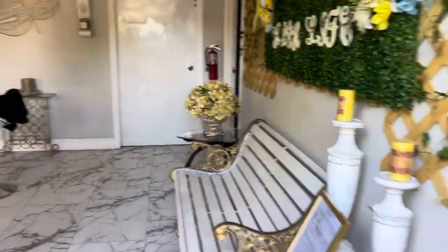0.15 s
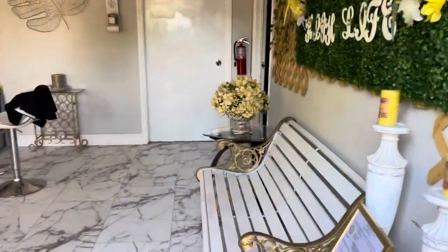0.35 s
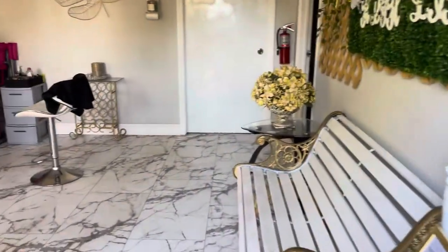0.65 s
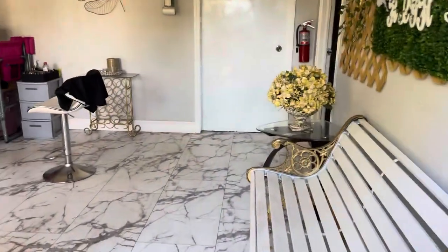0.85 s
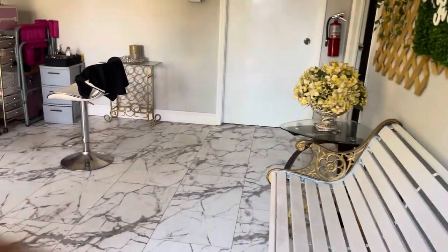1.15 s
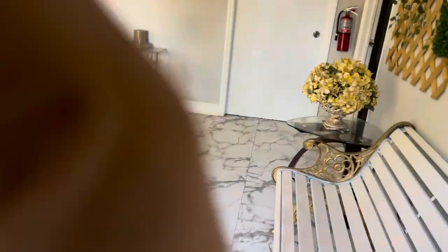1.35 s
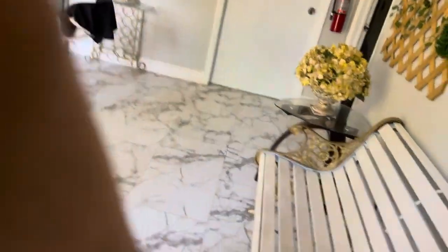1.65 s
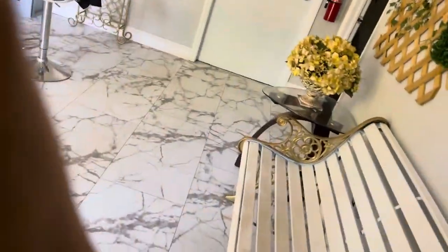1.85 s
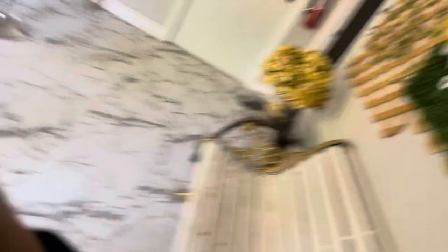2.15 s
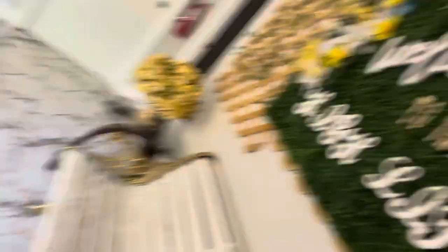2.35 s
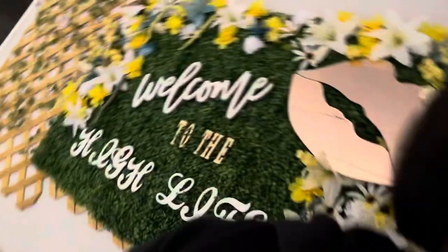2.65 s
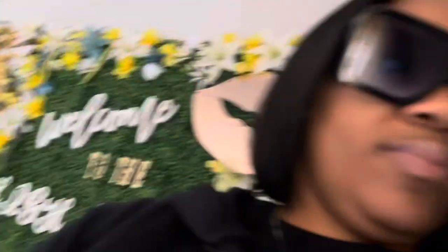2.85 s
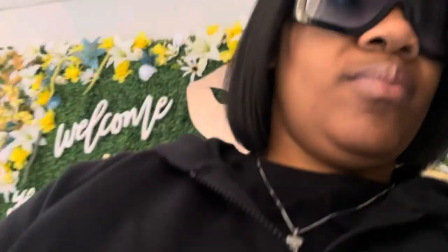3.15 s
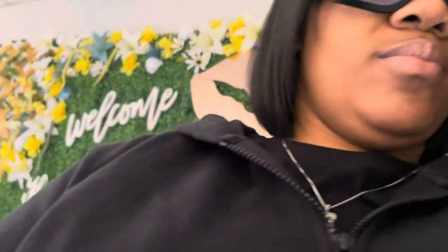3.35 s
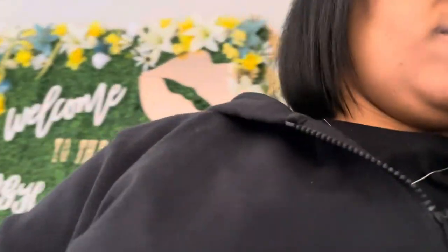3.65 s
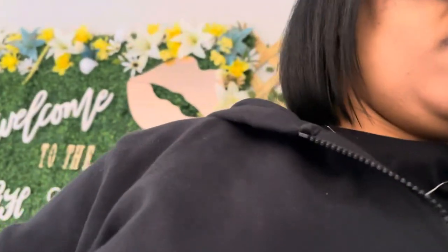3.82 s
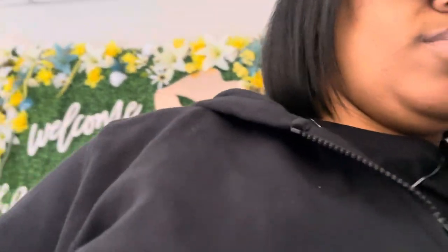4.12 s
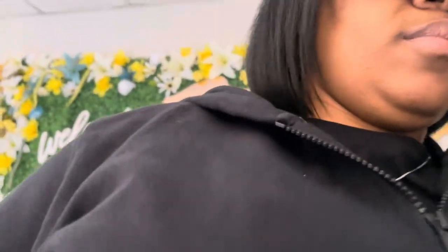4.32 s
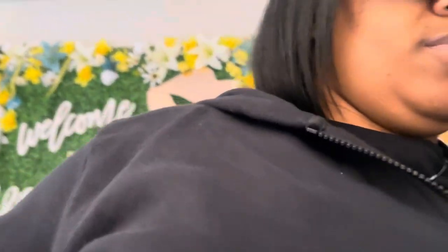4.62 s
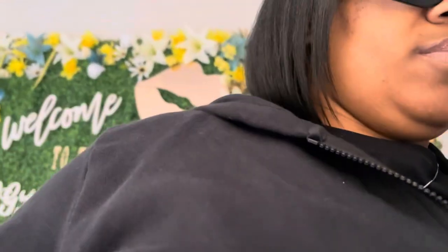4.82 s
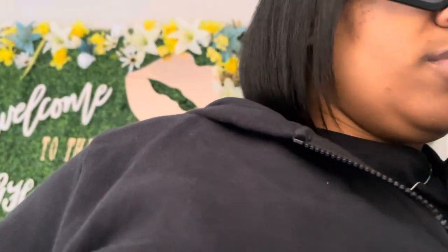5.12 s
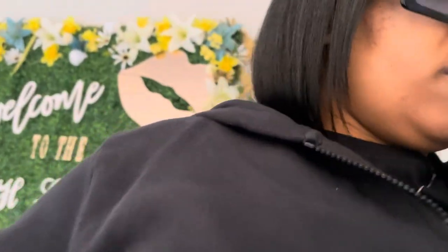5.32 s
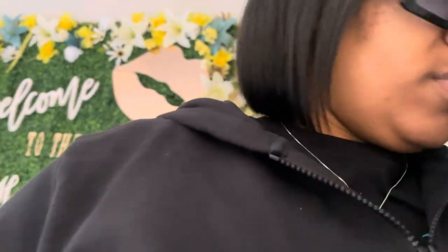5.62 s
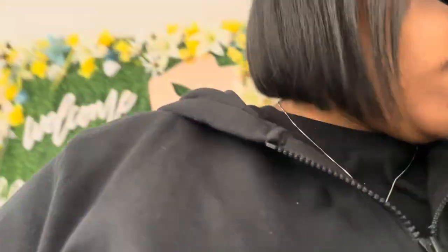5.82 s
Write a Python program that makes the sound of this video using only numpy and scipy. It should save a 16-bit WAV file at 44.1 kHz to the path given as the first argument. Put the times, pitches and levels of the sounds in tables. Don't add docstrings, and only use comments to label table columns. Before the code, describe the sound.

A reverberant tiled entrance room, heard through a handheld stereo phone microphone. At 0 s a deep, short double boom of a door leaf swells and dies, with handling rumble and jacket rustle. Until 2 s small bright key ticks, dull bumps and cloth snaps follow movement; a moderate metallic knock rings at 1.4 s and a crisp key tick comes at 1.5 s. At 2.15 s a firm double knock leads directly into a very loud, woody slam at 2.3 s, rebounding several times, with low boom and ringing panel fading until about 3 s. Loose fittings rattle from 2.4 to 2.7 s, and cloth and a bright key tick stand out near 2.5 s. Then it is quiet: soft sleeve slides around 3.3, 4.4, 4.8, 5.3 and 5.7 s, over faint air. A hard latch clack sounds at 3.97 s, a sharper, ringing bolt clack at 5.08 s. A barely audible distant motor hums between 4.6 and 5 s.

```python
import sys
import numpy as np
from scipy import signal
from scipy.fft import rfft, irfft
from scipy.io import wavfile
from scipy.ndimage import uniform_filter1d

SR = 44100
rng = np.random.default_rng(int(sys.argv[2]) if len(sys.argv) > 2 else 0)


def pcm_store(signal):
    levels = np.round(np.clip(np.atleast_2d(signal), -1, 1) * 32767)
    wavfile.write(sys.argv[1], SR, levels.astype(np.int16).T)


def voltage_ratio(decibels):
    exponent = np.asarray(decibels, float) / 20
    return 10 ** exponent


N = 263433
T = np.arange(N) / SR
HZ = np.arange(N // 2 + 1) * SR / N + 1e-3

# (frequency [Hz], width [Hz], lift [dB])
LEAF_BODY = [(207, 22, -1.5), (251, 22, 2), (267.1, 3.5, 4.5), (320, 5.6, 2.5), (376, 16, 7), (442, 3, 3.5),
             (530, 18, -1), (599.7, 31, 4.5), (697, 9.6, 5), (900, 26, 3), (1143, 60, 4.5), (1370, 170, 4)]


def on_log(table, col=1):
    t = np.array(table, float)
    return np.interp(np.log(HZ), np.log(t[:, 0]), t[:, col])


def colour(x, spectrum, body=()):
    octaves_below = np.clip(np.log2(spectrum[0][0] / HZ), 0, 4)
    db = on_log(spectrum) - 12 * octaves_below
    for hz, width, lift_db in body:
        db = db + lift_db / (1 + (2 * (HZ - hz) / width) ** 2)
    cepstrum = irfft(np.log(voltage_ratio(db)), N)
    cepstrum[1:(N + 1) // 2] *= 2
    cepstrum[(N + 1) // 2:] = 0
    response = np.exp(rfft(cepstrum))
    return irfft(rfft(x) * response / np.sqrt(np.mean(abs(response) ** 2)), N)


def band_level(x, lo_hz, hi_hz):
    power = abs(rfft(x[0])[(HZ > lo_hz) & (HZ < hi_hz)]) ** 2
    return x / (np.sqrt(2 * power.sum()) / N)


def walk(rate):
    k = int(SR / rate)
    steps = np.repeat(rng.standard_normal(N // k + 1), k)
    w = uniform_filter1d(uniform_filter1d(steps, k), k)[:N]
    return w / w.std()


def decay(t, t60):
    return np.exp(-np.log(1000) * t / t60)


def blow(events, spectrum, body):
    near, far = np.zeros((2, N)), np.zeros(N)
    for s, db, shudder_ms, hall_db in events:
        t = np.clip(T - s, 0, None)
        onset = np.clip(t / 0.00055, 0, 1)
        shudder = onset * np.exp(-t * 1000 / shudder_ms) * voltage_ratio(1.5 * walk(150))
        hit = colour(shudder * rng.standard_normal((2, N)), spectrum, body)
        hit *= voltage_ratio(db) / abs(hit).max()
        near += hit
        far += hit[0] * voltage_ratio(hall_db)
    return near, far


def rings(strikes, modes):
    out = np.zeros((2, N))
    t = T[:SR // 2]
    rise = 1 - np.exp(-t / 0.003)
    for hz, mode_db, t60 in modes:
        waver = voltage_ratio(4 * walk(45))
        for (s, db), turn in zip(strikes, rng.random((len(strikes), 2, 1))):
            i = int(s * SR)
            swing = np.sin(2 * np.pi * (hz * t + turn))
            level = voltage_ratio(db + mode_db) * waver[i:i + len(t)]
            out[:, i:i + len(t)] += level * rise * decay(t, t60) * swing
    return out


def ticks(events, spread, steep=1):
    near, far = np.zeros((2, N)), np.zeros(N)
    size, lead_s = 4096, 0.004
    t, f = T[:size], np.arange(1, size // 2 + 2) * SR / size
    for s, db, hz, ms, hall_db in events:
        fade = np.exp(-np.clip(t - lead_s, 0, None) * 1000 / ms) * (t >= lead_s)
        burst = rng.standard_normal((2, size)) * fade
        burst[:, int(lead_s * SR)] += 4
        octaves = np.log2(f / hz) / spread * np.where(f > hz, steep, 1)
        tick = irfft(rfft(burst) * np.exp(-0.5 * octaves ** 2), size)
        i = int((s - lead_s) * SR)
        tick = (tick * voltage_ratio(db) / abs(tick).max(axis=1, keepdims=True))[:, :N - i]
        near[:, i:i + size] += tick
        far[i:i + size] += tick[0] * voltage_ratio(hall_db)
    return near, far


def gesture(s, db, rise_s, fall_s, shape=1):
    rise_s, fall_s = max(rise_s, 0.005), max(fall_s, 0.005)
    away = np.maximum((s - T) / rise_s, (T - s) / fall_s)
    return voltage_ratio(db - 20 * away ** shape) ** 2


def rub(spectrum, body, lo_hz, hi_hz, grit_db, flutter_db):
    grit = grit_db * np.minimum(rng.exponential(size=N), 4)
    grains = rng.standard_normal((2, N)) * voltage_ratio(grit + flutter_db * walk(40))
    return band_level(colour(grains, spectrum, body), lo_hz, hi_hz)


def slam():
    # (time [s], peak [dB], shudder [ms], hall [dB])
    blows = [
        (2.3055, -4, 5, -6.5),
        (2.309, -1.5, 13.7, -6),
        (2.325, -0.5, 12.7, -6),
        (2.347, -6, 15.7, -7),
        (2.381, -12, 21, -7),
        (2.401, -16.5, 25, -5.5),
    ]
    # (frequency [Hz], density [dB per Hz])
    spectrum = [(130, -7.5), (260, -3), (500, -8), (900, -9), (1500, -17), (2400, -25.5), (3800, -26.5),
                (5500, -33.5), (7500, -38), (10500, -34), (11800, -40), (13000, -49.5), (15500, -96.5)]
    # (time [s], level [dB])
    strikes = [(2.306, -18), (2.326, -23), (2.349, -25.5), (2.381, -27.5)]
    # (frequency [Hz], level [dB], t60 [s])
    modes = [(200.3, -8, 0.3), (233, -6, 0.22), (276, -3.5, .15), (316, -1.5, 0.17), (377, -3.5, .2),
             (501, -3.5, 0.24), (587, -7, 0.25), (746, -7, 0.24), (900, -7.5, 0.3), (1049, -7, 0.21),
             (1640, -16.5, 0.27), (2052, -16.5, 0.086), (2299, -18, .17), (4300, -20, 0.34)]
    near, far = blow(blows, spectrum, LEAF_BODY)
    return near + rings(strikes, modes), far


def booms():
    # (time [s], deep level [dB], upper level [dB], upper pitch [Hz], t60 [s])
    touches = [(0.008, -18, -3, 94.5, 0.058), (0.042, -16, -7.5, 84.3, 0.1), (0.068, -32, -20, 76.5, 0.57),
               (1.439, -37, -31, 81.6, 0.43), (1.602, -52, -47, 72, 0.68), (1.968, -43, -35.5, 81.3, 0.21),
               (2.158, -21.5, -19, 88, 0.29), (2.307, -25, -15, 98, 0.18), (2.331, -9, -4.5, 81.5, 0.21),
               (2.427, -14.5, -22.5, 80, 0.32), (2.53, -18, -31, 79.05, 0.61),
               (2.751, -24.5, -35.5, 75.4, 0.54), (2.899, -34, -45, 77.3, 0.81),
               (3.069, -39.5, -54, 76, 0.42)]
    deep_hz, deep_rise_s, upper_rise_s = 48.3, 0.0018, 0.0097
    out = np.zeros(N)
    next_times = [touch[0] for touch in touches[1:]] + [99]
    for (s, deep_db, upper_db, hz, t60), next_s in zip(touches, next_times):
        t = np.clip(T - s, 0, None)
        fade = decay(t, t60) * np.exp(-np.clip(T - next_s, 0, None) / 0.015)
        deep = voltage_ratio(deep_db) * (1 - np.exp(-t / deep_rise_s)) * np.sin(2 * np.pi * deep_hz * t)
        upper = voltage_ratio(upper_db) * (1 - np.exp(-t / upper_rise_s)) * np.sin(2 * np.pi * hz * t)
        out += fade * (deep + upper)
    return out * np.array([[1], [0]])


def knocks():
    # (time [s], peak [dB], shudder [ms], hall [dB])
    fitting_blows = [
        (1.416, -29.5, 25, -2.5),
        (2.140, -40, 9, -5),
        (2.1495, -19, 12, -6),
    ]
    # (time [s], peak [dB], shudder [ms], hall [dB])
    leaf_blows = [
        (2.157, -17.5, 10, -5),
        (2.177, -18.5, 17, -3.5),
    ]
    # (frequency [Hz], density [dB per Hz])
    spectrum = [(130, -11), (260, -8.5), (500, -17.5), (900, -19.5), (1500, -23), (2400, -24),
                (3800, -30.5), (5500, -27.5), (7500, -30.5), (10500, -27), (11800, -39), (13000, -45.5),
                (15500, -94.5)]
    # (frequency [Hz], width [Hz], lift [dB])
    fitting_body = [(300, 300, -3), (950, 560, 9.5), (2760, 160, 4.5), (3817, 500, 5.5), (4540, 230, -14.5)]
    # (time [s], level [dB])
    fitting_strikes = [(1.418, -35.5), (1.51, -55), (1.545, -49)]
    leaf_strikes = [(2.157, -27), (2.178, -32)]
    # (frequency [Hz], level [dB], t60 [s])
    fitting_modes = [(228, 1.5, 0.23), (305, -6, 0.25), (388, -4, .15), (520, -16, .2), (730, -23, 0.17),
                     (833, -8, 0.16), (994, -16, 0.12), (1340, -8, 0.11), (1730, -13, 0.096)]
    leaf_modes = [(205.6, 0, .3), (504, -12, 0.22), (888, -14.5, 0.35), (1110, -14.5, 0.19),
                  (1254, -11.5, .17), (1599, -17.5, 0.16), (1868, -19, 0.33), (2900, -20.5, .28),
                  (3321, -24, 0.25)]
    fitting_near, fitting_far = blow(fitting_blows, spectrum, fitting_body)
    leaf_near, leaf_far = blow(leaf_blows, spectrum, LEAF_BODY)
    ringing = rings(fitting_strikes, fitting_modes) + rings(leaf_strikes, leaf_modes)
    return fitting_near + leaf_near + ringing, fitting_far + leaf_far


def latch():
    # (time [s], peak [dB], shudder [ms], hall [dB])
    blows = [
        (3.961, -37, 22, -7),
        (3.966, -31.5, 3, -7.5),
        (3.9695, -20, 5.5, -8),
        (3.984, -33, 20.6, -7),
    ]
    # (frequency [Hz], density [dB per Hz])
    spectrum = [(130, -7.5), (260, -5), (500, -11.5), (900, 0), (1500, -10.5), (2400, -16.5), (3800, -16.5),
                (5500, -18), (7500, -14), (10500, -13), (11800, -23), (13000, -33), (15500, -65)]
    # (frequency [Hz], width [Hz], lift [dB])
    body = [(600, 50, 11), (940, 190, 6), (1640, 50, 3.6), (2900, 590, 10)]
    # (time [s], level [dB])
    strikes = [(3.969, -41)]
    # (frequency [Hz], level [dB], t60 [s])
    modes = [(221, -11, 0.32), (299, -11, 0.21), (580, -20, .2), (905, -10, 0.1), (1275, 0, 0.06),
             (1480, -11, 0.27), (2560, -16, .25), (3100, -14, 0.19)]
    near, far = blow(blows, spectrum, body)
    return near + rings(strikes, modes), far


def bolt():
    # (time [s], peak [dB], shudder [ms], hall [dB])
    blows = [
        (5.078, -20.5, 6.6, -7.5),
        (5.092, -34, 35, -16),
    ]
    # (frequency [Hz], density [dB per Hz])
    spectrum = [(60, -14), (130, -4), (260, -22), (500, -9.5), (900, 2), (1500, -11.5), (2400, -8),
                (3800, -19), (5500, -23.5), (7500, -11), (10500, -7.5), (11800, -23.5), (13000, -39),
                (15500, -57)]
    # (frequency [Hz], width [Hz], lift [dB])
    body = [(652, 104, 14), (870, 190, 4), (2765, 540, 1), (3200, 430, 6.5), (5260, 810, 13.5)]
    # (time [s], level [dB])
    strikes = [(5.079, -37), (5.125, -43)]
    # (frequency [Hz], level [dB], t60 [s])
    modes = [(299.5, -21.5, 0.25), (688, 2, 0.14), (1520, -24, .12), (1800, -28, .1), (2320, -19, .1),
             (3400, -19, 0.11), (4440, -21, .1), (5620, -27, 0.11)]
    near, far = blow(blows, spectrum, body)
    return near + rings(strikes, modes), far


def rattles():
    # (time [s], peak [dB])
    contacts = [(2.4339, -33.5), (2.4753, -27), (2.4814, -33), (2.6044, -35.5), (2.6134, -41), (2.657, -43)]
    hz, ms, hall_db = 5600, 4.5, -5
    return ticks([(s, db, hz, ms, hall_db) for s, db in contacts], spread=0.72)


def keys():
    # (time [s], peak [dB], centre [Hz])
    contacts = [(0.0727, -35, 10100), (0.6323, -37.5, 9700), (0.6954, -32, 10100), (0.7635, -34, 9900),
                (0.8796, -45, 7850), (1.038, -59.5, 10300), (1.1101, -27.5, 12600), (1.3279, -68, 8100),
                (1.3528, -38, 11600), (1.5395, -21.5, 14600), (1.6225, -34.5, 12100),
                (1.6347, -31.5, 13600), (1.8043, -42, 11000), (2.55, -22, 11950), (3.848, -58, 6040),
                (3.866, -59, 5530), (4.2142, -57, 7350), (4.2205, -74, 3040), (4.4271, -54, 7500)]
    ms, hall_db = 2.2, -10
    return ticks([(s, db, hz, ms, hall_db) for s, db, hz in contacts], spread=0.7, steep=3.2)


def fittings():
    # (time [s], peak [dB], centre [Hz], hall [dB])
    contacts = [(0.0456, -35, 2890, -19), (0.1123, -35.5, 2750, -1), (0.136, -45, 2700, 0),
                (.26, -47, 2200, 3), (.38, -49.5, 2670, 0), (0.695, -44, 1810, 4), (0.8776, -39, 1640, -9),
                (1.2103, -48.5, 1210, 8), (1.418, -26.5, 3300, -22), (1.8054, -38.5, 1640, -27),
                (1.873, -47, 1190, 6), (1.9226, -44.5, 1130, -1), (1.9896, -62, 2720, -18),
                (2.109, -48, 1460, -8), (2.727, -40, 1000, -7), (2.843, -43, 900, -8),
                (1.54, -48, 2750, -8), (3.863, -52, 2900, 2.5), (3.94, -46, 1533, -2),
                (4.1988, -52.5, 1470, -21), (4.198, -67, 3220, -17), (4.221, -56, 1470, -15),
                (.9, -46, 1600, -15), (1.234, -61, 1400, -4), (1.595, -46, 1930, 4),
                (1.966, -54, 4216, -15), (5.607, -48.5, 1260, 1), (5.9256, -66.5, 1384, -23)]
    return ticks([(s, db, hz, 1.2, hall_db) for s, db, hz, hall_db in contacts], spread=0.4)


def bumps():
    # (time [s], peak [dB], centre [Hz], hall [dB])
    contacts = [(0.071, -37, 740, -17), (0.105, -37, 800, -15), (0.583, -34, 554, -6),
                (1.208, -42.5, 423, -2.5), (1.807, -38.5, 641, -10.5), (1.871, -44.5, 474.3, -6),
                (2.841, -40.5, 520, -7), (2.949, -43.5, 610, -6.5), (2.76, -40.5, 280.6, -3.5),
                (1.249, -44.5, 260, -4), (.70, -40, 520, -6), (3.748, -54.5, 695, 4), (3.92, -46.5, 567, 0),
                (3.939, -37, 393, -7), (3.949, -41.5, 375, -3.5), (4.197, -51.5, 500, -30),
                (4.221, -53, 520, -7), (5.932, -57, 398, -4)]
    return ticks([(s, db, hz, 4.4, hall_db) for s, db, hz, hall_db in contacts], spread=0.6)


def jingle():
    # (time [s], pitch [Hz], level [dB], t60 [s])
    touches = [(.073, 10600, -43.5, 0.2), (0.075, 4060, -48.5, 0.2), (.10, 11900, -64, 0.12),
               (.10, 12500, -51.5, .15), (1.416, 2760, -46, 0.12), (5.025, 2490, -75, .06),
               (5.062, 2540, -63, 0.088), (0.016, 2700, -50, 0.093), (.068, 690, -42, .12),
               (.068, 861, -45, .15), (.09, 1007, -46, .25), (.095, 608, -42, .2), (.035, 190, -38, .1),
               (.935, 460, -52, .15), (.962, 630, -53, .3), (1.348, 2180, -60, .08), (1.22, 200, -51, .2),
               (2.288, 1320, -44, .15), (1.97, 600, -49, .12)]
    out = 0
    for s, hz, db, t60 in touches:
        t = np.clip(T - s, 0, None)
        pair = np.sin(2 * np.pi * hz * t * np.array([[1], [1.004]]))
        shimmer = 1 + 0.4 * np.cos(2 * np.pi * 31 * t)
        out = out + voltage_ratio(db) * pair * shimmer * decay(t, t60)
    return out


def jacket():
    # (time [s], cloth [dB], time to slacken by 20 dB [s], sleeve swish [dB])
    stride_table = [(0, -49.5, 0.22, -54.5), (0.085, -53.5, 0.41, -51), (0.188, -57.5, 0.2, -67),
                    (.26, -57.5, 0.15, -85), (.37, -62, 1.8, -76.5), (0.586, -55, 0.5, -63.5),
                    (0.698, -56.5, 0.4, -51.5), (0.881, -55, 0.32, -61.5), (1.219, -62, 1, -68.5),
                    (1.3, -56, 0.27, -86), (1.49, -52, 0.19, -69.5), (1.595, -53.5, 0.08, -62),
                    (1.887, -62.5, 0.12, -67), (1.92, -58.5, 0.33, -63), (1.965, -55, 0.26, -61),
                    (2.0, -56.5, -0.33, -62), (2.499, -39, 0.2874, -54.5), (2.612, -45.5, 0.1925, -61.5),
                    (2.728, -70, 1.47, -72), (2.844, -60, 0.55, -73.5), (2.952, -60.5, 0.62, -74.5)]
    # (time [s], cloth [dB], time to rise 20 dB [s], time to fall 20 dB [s])
    swell_table = [(3.101, -60.5, -1.1, 0.28), (3.25, -53.5, -0.03, 0.16), (3.345, -53, -0.15, 0.16),
                   (3.761, -74, -0.7, 16), (3.864, -63, -0.15, 0.4), (4.169, -86, 0.55, 0),
                   (4.352, -56.5, -0.07, 0.1), (4.501, -54.5, 0.34, 0.15), (4.77, -58, 0.12, -0.05),
                   (5.27, -57, 0.07, 0.12), (5.664, -55.5, 0.06, 0.07), (5.935, -61.5, -0.28, 0.5)]
    # (frequency [Hz], density [dB per Hz])
    stride_colour = [(260, -9.5), (600, -7), (1000, -9), (1500, -17.5), (2400, -25), (3800, -24.5),
                     (8000, -45.5)]
    cloth_colour = [(500, -11), (900, -10), (1400, -16.5), (2000, -18.5), (2800, -25), (4300, -26),
                    (5500, -31.5), (7500, -58), (10500, -32), (12000, -59), (15500, -70)]
    swish_colour = [(2400, -29), (3800, -24), (5500, -21.5), (7500, -18.5), (10500, -14.5), (11800, -30.5),
                    (13000, -46.5), (15500, -66)]
    # (frequency [Hz], width [Hz], lift [dB])
    cloth_body = [(1305, 200, 7)]
    snap_s, swish_steeper = 0.028, 2.1
    seated_swish_db, quiet_swish_db = -29, -93.5

    strides = sum(gesture(s, db, snap_s, fall) for s, db, fall, _ in stride_table)
    swells = sum(gesture(*row, shape=1.59) for row in swell_table)
    sleeve = sum(gesture(s, db, snap_s / swish_steeper, fall / swish_steeper)
                 for s, _, fall, db in stride_table)
    sleeve = sleeve + voltage_ratio(seated_swish_db) ** 2 * swells + voltage_ratio(quiet_swish_db) ** 2

    walking = rub(stride_colour, [(2700, 660, 6.5)], 370, 3100, grit_db=3.5, flutter_db=1.4)
    seated = rub(cloth_colour, cloth_body, 390, 2500, grit_db=2.5, flutter_db=0.9)
    swish = rub(swish_colour, (), 5200, 8000, grit_db=2.5, flutter_db=1.0)
    return np.sqrt(strides) * walking + voltage_ratio(-4.0) * np.sqrt(swells) * seated + np.sqrt(sleeve) * swish


def drag():
    # (time [s], pitch [Hz], level [dB])
    path = [(2.999, 954, -84), (3.1, 1085, -63), (3.2, 1285, -71), (3.28, 1391, -58), (3.34, 1437, -60),
            (3.399, 1348, -70.5), (3.5, 1210, -89.5), (4.281, 1150, -80), (4.341, 1150, -66),
            (4.5, 1300, -69), (4.631, 1300, -82), (4.76, 1320, -63), (5.0, 1300, -100), (5.27, 1350, -61),
            (5.4, 1300, -97), (5.57, 1350, -92), (5.64, 1380, -64.5), (5.8, 1300, -89)]
    width_hz = 700
    s, hz, db = np.transpose(path)
    k = int(SR / width_hz)
    slow = uniform_filter1d(uniform_filter1d(rng.standard_normal((2, 2, N)), k), k // 2)
    phase = 2 * np.pi * np.cumsum(np.interp(T, s, hz)) / SR
    rasp = (slow[0] * np.cos(phase) + slow[1] * np.sin(phase)) / slow.std()
    return rasp * voltage_ratio(np.interp(T, s, db, left=-120, right=-120) + 2.5 * walk(34))


def hand():
    # (time [s], rumble [dB])
    grip = [(0, -41), (.2, -50.5), (.5, -55.5), (1.1, -56.5), (1.5, -51), (1.66, -58), (1.86, -59.5),
            (2.0, -53), (2.5, -48), (3.0, -53.5), (3.35, -66), (3.6, -76), (5.97, -77)]
    # (time [s], rumble [dB])
    jolts = [(3.88, -67), (4.0, -64.5), (4.21, -63), (4.8, -60.5), (5.17, -64), (5.31, -67), (5.64, -74),
             (5.94, -75)]
    jolt_s = 0.16
    power = voltage_ratio(np.interp(T, *np.transpose(grip))) ** 2
    power = power + sum(gesture(s, db, jolt_s, jolt_s) for s, db in jolts)
    spectrum = [(45, -2.0), (95, 0.5), (200, -10.0), (400, -23.5), (1000, -60)]  # (Hz, dB per Hz)
    return np.sqrt(power) * rub(spectrum, (), 77, 300, grit_db=0.8, flutter_db=1.5)


def hall(x):
    # (frequency [Hz], t60 [s])
    t60_table = [(100, 1), (220, 0.75), (500, 0.39), (1500, 0.22), (5000, 0.29), (12000, 0.17)]
    table_hz, table_t60 = np.transpose(t60_table)
    tail = 0
    for hz in 60 * 2.0 ** np.arange(9):
        t60 = np.interp(np.log(hz), np.log(table_hz), table_t60)
        share = np.clip(1 - abs(np.log2(HZ / hz)), 0, 1)
        fade = decay(T, t60) * np.clip(T / 0.012, 0, 1)
        echoes = rng.standard_normal((2, N)) * fade / np.sqrt(np.sum(fade ** 2))
        tail = tail + irfft(rfft(echoes) * np.sqrt(share), N)
    treble_loss = 1 + (HZ / 12400) ** 24
    return irfft(rfft(x) * rfft(tail) / treble_loss, N)


def air():
    # (start [s], end [s], pitch [Hz], level [dB])
    motor = (4.58, 5.06, 182, -72)
    # (frequency [Hz], density [dB per Hz])
    spectrum = [(60, 4), (130, -4.5), (260, -1.5), (500, -16.5), (900, -22.5), (1500, -27.5), (2400, -27),
                (3800, -28.5), (5500, -38), (7500, -41), (10500, -32), (11800, -37), (13000, -42.5),
                (15500, -45)]
    start_s, end_s, hz, db = motor
    fade = np.clip(np.minimum(T - start_s, end_s - T) / 0.097, 0, 1)
    hum = voltage_ratio(db + 2.0 * walk(9.1)) * fade * np.sin(2 * np.pi * hz * T)
    hiss = band_level(colour(rng.standard_normal((2, N)), spectrum), 30, 14000)
    return hum + voltage_ratio(-74 + 0.5 * walk(3.8)) * hiss


def scene():
    contacts = [slam(), knocks(), latch(), bolt(), rattles(), keys(), fittings(), bumps()]
    direct = sum(near for near, _ in contacts)
    echoes = hall(sum(far for _, far in contacts))
    return direct + echoes + booms() + jingle() + jacket() + drag() + hand() + air()


def roll_off(x):
    return signal.sosfilt(signal.butter(12, 15800, fs=SR, output="sos"), x)


def record(dry):
    # (frequency [Hz], left leads by [rad], likeness [0-1], left minus right [dB])
    ports = [(30, 0, .998, -.7), (110, 0, .995, -1), (220, 0, .96, -3.5), (400, .6, .7, -5.5),
             (700, 2.2, .4, -3), (1200, 1.9, .4, -.8), (1800, 0, .85, 0), (3000, .4, .4, -1),
             (4200, 1, .5, -1), (4900, np.pi, .6, 0), (5750, 2 * np.pi, 1, 0), (6300, 2 * np.pi, 1, 0),
             (7200, 7.6, .8, 0), (8350, 3 * np.pi, 1, 0), (9500, 3 * np.pi, 1, 0), (10500, 10.8, .88, 0),
             (11900, 4 * np.pi, .94, 0)]
    dry = signal.sosfilt(signal.butter(6, 37, "high", fs=SR, output="sos"), dry)
    top_step = voltage_ratio(-14 * (1 + np.tanh((HZ - 12900) / 300)) / 2)
    a, b = rfft(np.tanh(1.104 * dry) / 0.95) * top_step
    port_hz, *columns = np.transpose(ports)
    lead, like, pan_db = (np.interp(HZ, port_hz, column) for column in columns)
    same, other = np.sqrt((1 + like) / 2) * a, np.sqrt((1 - like) / 2) * b
    turn = np.exp(0.5j * lead) * voltage_ratio(pan_db / 2)
    x = irfft(np.array([(same + other) * turn, (same - other) / turn]), N)
    x = x * np.clip((T[-1] - T) / 0.01, 0, 1)
    ceiling = 0.93
    x = x / ceiling
    mix = ceiling * np.tanh(x + x ** 3 / 3)
    return roll_off(mix)


dry = scene()
out = record(dry)
pcm_store(out)
```